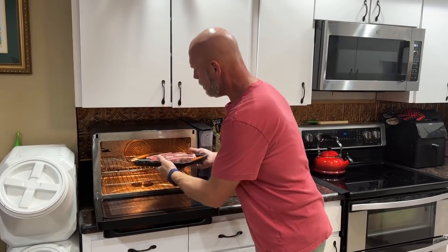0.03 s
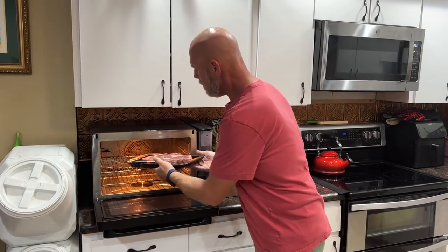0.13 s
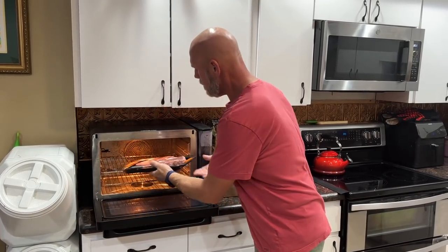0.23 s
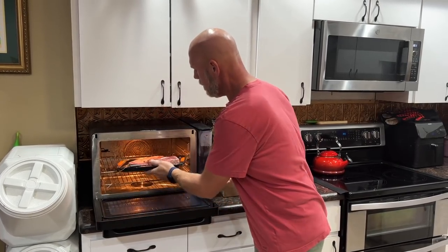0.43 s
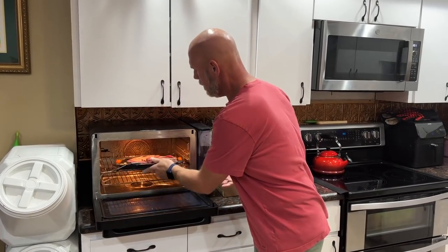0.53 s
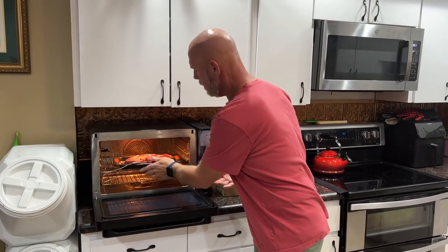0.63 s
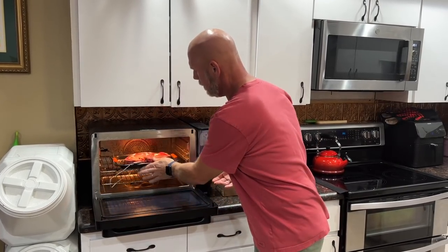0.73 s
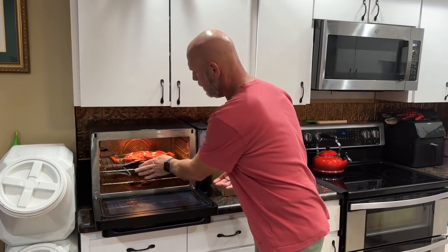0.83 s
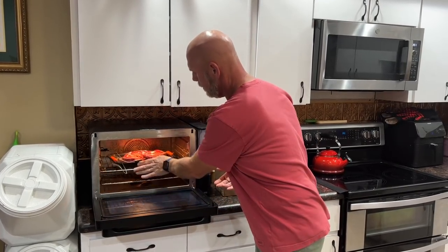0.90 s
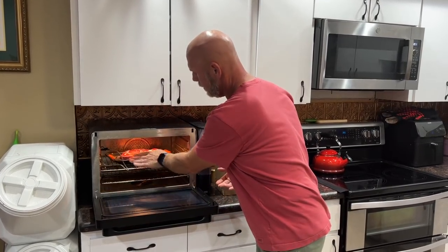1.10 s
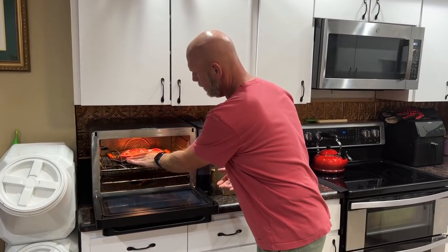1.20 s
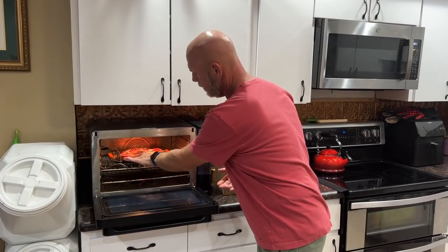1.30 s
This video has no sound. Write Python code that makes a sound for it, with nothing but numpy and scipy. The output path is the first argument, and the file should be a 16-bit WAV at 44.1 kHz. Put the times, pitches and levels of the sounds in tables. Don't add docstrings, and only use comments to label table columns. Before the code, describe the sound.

Close up in a small reverberant kitchen, a tray is pushed onto an oven rack: sharp metallic clang and scrape, a brief lull, a second clatter, then light taps and low rumbles over steady fan hum.

```python
import sys
import numpy as np
from scipy import signal
from scipy.fft import rfft, irfft
from scipy.io import wavfile
from scipy.ndimage import uniform_filter1d

SR = 44100
rng = np.random.default_rng(int(sys.argv[2]) if len(sys.argv) > 2 else 0)


def file_out(sig):
    cols = np.atleast_2d(sig).T
    lim = np.clip(cols, -1, 1)
    pcm = np.round(lim * 32767).astype(np.int16)
    wavfile.write(sys.argv[1], SR, pcm)


def makeup_ratio(level_db):
    decades = np.asarray(level_db, float) / 20
    return 10 ** decades


N = 59535


def evened(x):
    return x / np.sqrt(np.mean(x ** 2) + 1e-20)


def read(points, hz):
    f, value = np.transpose(points)
    return np.interp(np.log(hz + 1), np.log(f + 1), value)


def resonate(x, hz, width):
    r = np.exp(-np.pi * width / SR)
    return 2 * signal.lfilter([1 - r], [1, -r * np.exp(2j * np.pi * hz / SR)], x).real


# (frequency [Hz], density [dB per Hz])
AIR_COLOUR = [(30, -48), (50, -14), (122, -8), (176, -38.5), (230, -9), (330, -24.5), (800, -25.5),
              (9000, -61.5), (16500, -85)]
# (frequency [Hz], correlation [0-1])
AIR_LIKENESS = [(60, 1), (240, 0.84), (950, 0.43), (3770, 0.41), (15000, 0.18)]
# (frequency [Hz], width [Hz], level [dB])
FAN_TONES = [(51.4, 14.7, -55.5), (114, 12.4, -52), (234.9, 6.6, -56), (475.6, 27, -53.5),
             (1300, 15, -70.5)]
# (time [s], level [dB])
FAN_SWELL = [
    (0, -8),
    (.5, 0),
    (.8, 5),
    (1.35, 1.5),
]


def fan():
    frames, hz = N // 512 + 5, np.fft.rfftfreq(2048, 1 / SR)
    a, b, c, d = rng.standard_normal((frames, 1025, 4)).T
    same = np.clip(read(AIR_LIKENESS, hz), -1, 1)[:, None]
    left = a + 1j * b
    right = same * left + np.sqrt(1 - same ** 2) * (c + 1j * d)
    bands = np.array([left, right]) * makeup_ratio(read(AIR_COLOUR, hz))[:, None]
    air = signal.istft(bands, nperseg=2048, noverlap=1536)[1][:, 2048:N + 2048]
    air = makeup_ratio(-43) * evened(air)

    noise = rng.standard_normal(N + SR)
    swell = makeup_ratio(np.interp(np.arange(N) / SR, *np.transpose(FAN_SWELL)))
    tones = np.zeros(N)
    for hz, width, db in FAN_TONES:
        tone = resonate(resonate(noise, hz, width), hz, width)[SR:]
        tones += makeup_ratio(db) * swell ** np.sqrt(hz / 238) * evened(tone)
    return np.pad(air, ((0, 0), (0, N - air.shape[1]))) + tones


def decaying(colour, t60s, size):
    hz, t, z = signal.stft(rng.standard_normal((2, size)), SR, nperseg=256)
    fade = makeup_ratio(-60 * t / read(t60s, hz)[:, None])
    tail = signal.istft(z * fade, SR, nperseg=256)[1][:, :size]

    f = np.fft.rfftfreq(8192, 1 / SR)
    log_gain = np.log(makeup_ratio(np.maximum(read(colour, f), -100)))
    mirrored = np.r_[log_gain, log_gain[-2:0:-1]]
    blow = np.fft.ifft(np.exp(signal.hilbert(mirrored).conj())).real[:4096]

    evenness = 0.7
    modes = rfft(tail, 2 * size)
    power = abs(modes) ** 2 + 1e-20
    near = uniform_filter1d(power, size=9, axis=1)
    wide = uniform_filter1d(power, size=151, axis=1)
    tail = irfft(modes * (wide / near) ** (evenness / 2), 2 * size)[:, :size]

    tail = signal.fftconvolve(tail, blow[None], axes=1)[:, :size]
    return tail / np.linalg.norm(tail, axis=1, keepdims=True), blow / np.linalg.norm(blow)


# (frequency [Hz], t60 [s])
KITCHEN_DECAY = [(150, 0.49), (1000, 0.82), (4000, 0.7), (14000, 0.28)]


def kitchen(x):
    tail = decaying([(60, -11), (16000, 1)], KITCHEN_DECAY, SR)[0]
    tail = np.pad(tail, ((0, 0), (400, 0)))
    return makeup_ratio(-8) * signal.fftconvolve(x, tail, axes=1)[:, :N]


def swelling_modes(events):
    out = np.zeros(N)
    rise_turns = 2.03
    for s, hz, db, t60 in events:
        age = np.maximum(np.arange(N) / SR - s, 0)
        rise = np.sin(np.pi / 2 * np.minimum(age * np.sqrt(hz * 150) / rise_turns, 1)) ** 2
        wave = np.sin(2 * np.pi * hz * age + rng.uniform(0, 2 * np.pi))
        out += makeup_ratio(db + 5 - 60 * age / t60) * rise * wave
    return out


# (time [s], pitch [Hz], level [dB], t60 [s])
SHUDDERS = [(.01, 53.4, -40, .4), (0.069, 54, -40, 0.42), (.14, 50.1, -36.5, 0.32), (.39, 52.6, -39.5, .4),
            (.52, 52, -41, .6), (.73, 55, -33, .35), (.8, 50, -36, 0.34), (.85, 62, -37.5, .3),
            (.955, 50, -33, .35), (1.019, 53, -36.5, .3), (1.105, 54.2, -33, 0.4), (1.19, 55.8, -37, .3),
            (1.299, 50.3, -35, .4)]


def shudders():
    return swelling_modes(SHUDDERS)


# (time [s],
# pitch [Hz], level [dB], t60 [s])
NOTES = [(.24, 282, -30.5, 0.28), (.252, 107.4, -20.5, 0.12), (.285, 256, -30, 0.18),
         (0.31, 108, -31, 0.35), (.32, 183, -33, 0.27), (.43, 294, -35, 0.89), (.503, 168, -22, 0.22),
         (.52, 300, -34, 0.41), (.525, 648, -31, 0.21), (0.564, 180, -26.5, 0.34), (0.59, 225.2, -25, 0.27),
         (0.61, 340, -24, 0.12), (0.6, 180, -31, 0.28), (0.64, 350, -29.5, 0.14), (0.71, 210, -35, 0.16),
         (0.66, 70, -44, 0.51), (0.8, 390, -31.5, 0.089), (0.795, 111.6, -32.5, 0.23),
         (.572, 1530, -22, 0.21), (.31, 2190, -33, 0.16), (.24, 3160, -24.5, 0.098),
         (.492, 3200, -26, 0.063), (.7, 1322, -53.5, 2.4), (1.0845, 2260, -37, .045),
         (1.0855, 2750, -39, .045), (1.153, 2960, -48, .04), (1.06, 2520, -52, .07), (1.01, 2750, -52, .07),
         (1.111, 1480, -39, .06), (1.1, 770, -43.5, 0.21), (0.51, 2600, -39, 0.04),
         (.226, 1900, -34, 0.075), (.295, 680, -32, .15), (.393, 492, -37, .12), (.24, 1075, -31.5, 0.23),
         (.275, 1405, -32, 0.19), (.575, 1075, -32, .3), (.7, 240, -35, 0.17), (.755, 162, -39, 0.29),
         (.74, 481, -48, 2.0), (.76, 466, -47, .8), (.505, 1040, -32.5, 0.23), (1.335, 4680, -58, .08),
         (.74, 355, -48.5, 1.2), (1.2, 234, -43, 0.59), (1, 102, -41, 0.33), (1.2, 100, -42, 0.35)]


def notes():
    return swelling_modes(NOTES)


# (time [s], fizz level [dB], clang level [dB], boom level [dB], chatter length [s])
CONTACTS = [(0.2242, -27.5, -42.5, -61, 0.022), (0.235, -28, -24, -31.5, 0.015),
            (0.267, -36, -28, -35, .012), (0.252, -36, -25.5, -28, 0.028), (0.284, -30, -24, -27, 0.052),
            (0.314, -38, -28, -34, 0.023), (0.348, -47, -30, -34.5, 0.049), (0.39, -52, -38.5, -35, 0.026),
            (0.452, -71, -44.5, -55, 0.011), (0.487, -22.5, -36.5, -37, 0.022),
            (0.507, -33.5, -31, -30.5, 0.02), (0.531, -35, -29, -34, 0.0094), (0.558, -25, -41, -48, 0.015),
            (0.568, -23.5, -24.5, -27, 0.019), (.587, -39, -23, -26, 0.0095), (0.613, -33, -26, -27, 0.017),
            (.625, -38.5, -30, -33.5, .012), (0.662, -43, -28.5, -36, 0.024), (0.713, -54, -47, -35, 0.012),
            (0.742, -48.5, -37, -35, 0.044),
            (0.794, -61, -63, -40.5, 0.071), (0.218, -53.5, -49, -63, .012),
           (0.909, -60.5, -54.5, -46.5, 0.067), (0.995, -55, -60, -48, 0.023),
           (1.083, -48.5, -38.5, -42, 0.0086), (1.097, -52, -44.5, -45, 0.01),
           (1.107, -54.5, -39.5, -41.5, 0.011), (1.126, -58.5, -43, -40.5, .01),
           (1.138, -75, -66, -47, 0.03), (1.21, -73, -53.5, -46, 0.09), (1.268, -63, -54, -64, 0.098),
           (1.329, -61, -49.5, -55, 0.035)]


def slips():
    slips_per_s, spread_db, rise_share = 9000, 2.5, 0.22
    t = np.arange(N) / SR
    strength = makeup_ratio(spread_db * np.minimum(rng.exponential(1, N), 4))
    train = strength * (rng.random(N) < slips_per_s / SR)
    train = evened(train * rng.choice([-1., 1.], N))
    power = np.zeros((3, N))
    for s, fizz_db, clang_db, boom_db, length in CONTACTS:
        age = np.maximum(t - s, 0)
        shape = np.minimum(age / (rise_share * length), 1) * np.exp(-(age / length) ** 2)
        power += (makeup_ratio([[fizz_db], [clang_db], [boom_db]]) * shape) ** 2 * 0.043 / length
    return np.sqrt(power) * train


# (frequency [Hz], t60 [s])
DENSE_DECAY = [(100, 0.067), (400, 0.49), (1500, 0.25), (5000, 0.28), (15000, 0.18)]


def body(colour, modes, modes_db):
    size = SR // 2
    t = np.arange(size) / SR
    wash, blow = decaying(colour, DENSE_DECAY, size)
    rings = np.zeros((2, size))
    for hz, db, t60 in modes:
        phase = rng.uniform(0, 2 * np.pi, (2, 1))
        rings += makeup_ratio(db - 60 * t / t60) * np.sin(2 * np.pi * hz * t + phase)
    rings *= np.minimum(t / 0.001, 1)
    out = wash + makeup_ratio(modes_db) * rings / np.linalg.norm(rings[0])
    return out + makeup_ratio(-4) * np.pad(blow, (0, size - len(blow)))


# (frequency [Hz], density [dB per Hz])
FIZZ = [(900, -44), (1900, -8.5), (3200, -1.5), (4350, -14.5), (5500, -4.5), (7000, -5.5), (9500, -9),
        (15600, -13)]
CLANG = [(210, -21), (350, -5), (520, -8.5), (720, -0.5), (815, -8.5), (960, -1.5), (1400, -2.5),
         (1960, -5.5), (6000, -18.5), (7800, -63), (13200, -120)]
BOOM = [(41, -52), (70, -14.5), (174, 0), (231, -5), (265, -3.5), (303, -3), (600, -15.5), (780, -35.5),
        (1320, -120)]
# (frequency [Hz], level [dB], t60 [s])
WIRE_MODES = [(3260, -1, 0.045), (5405, 3, 0.1), (6420, 1, 0.066), (7050, -1.5, 0.16)]
TRAY_MODES = [(655, -7, .25), (754, -9, .25), (880, -12, .2), (1080, -5, .3), (1266, -6, .25),
              (1404, -7, .2), (1535, -9, .15), (1748, -8, .2), (2200, -9, .2), (3080, -12, .15)]
BOX_MODES = [(110.8, 3.5, 0.29), (179, -4, 0.3), (270.2, 0, 0.53), (299.6, -2.5, 0.23), (351.2, 0, 0.27),
             (485, -4.5, 0.4)]


def tray():
    drives, spots = slips(), 3
    out = (notes() + shudders()) * np.ones((2, 1))
    turn = np.arange(N) / SR * 14.0
    for spot in range(spots):
        share = np.sqrt(2 / spots) * np.cos(np.pi * (turn - spot) / spots) ** 2 * np.sqrt(4 / 3)
        wires = body(FIZZ, WIRE_MODES, -10)
        sheet = body(CLANG, TRAY_MODES, -4.5)
        box = body(BOOM, BOX_MODES, -6.5)
        for drive, part in zip(drives, (wires, sheet, box)):
            out = out + signal.fftconvolve(share * drive[None], part, axes=1)[:, :N]

    a, b = rfft(out)
    hz = np.fft.rfftfreq(N, 1 / SR)
    same = np.interp(hz, [250, 900, 3000, 6000], [.85, .28, .35, .45])
    other = np.sqrt(1 - same ** 2)
    right = (same * a + other * b) / np.sqrt(np.where(hz < 400, same + other, 1))
    lead_s = 2.77 / SR
    left = a * np.exp(2j * np.pi * np.minimum(hz, 3300) * lead_s)
    return irfft(np.array([left, right]), N)


def scene():
    metal = tray()
    return metal + kitchen(metal) + fan()


def low_pass(x):
    return signal.sosfilt(signal.butter(12, 16960, fs=SR, output="sos"), x)


# (frequency [Hz], phase [half turns])
TREBLE_TURNS = [(8700, 0), (9850, .95), (10500, 1.05), (11700, 1.95), (12300, 2.05), (13500, 2.95),
                (14200, 3.05), (15400, 4)]


def record(dry):
    hz = np.fft.rfftfreq(N, 1 / SR)
    left, right = rfft(dry)
    tied = np.clip((hz - 7200) / 1400, 0, .99)
    turned = left * np.exp(1j * np.pi * np.interp(hz, *np.transpose(TREBLE_TURNS)))
    right = np.sqrt(1 - tied ** 2) * right + tied * turned
    left_db = 4.2
    lean = makeup_ratio(left_db / 2 * np.clip(hz / 1100, .35, 1) * (1 - tied))
    edge_db = -70 * np.clip((hz - 15680) / 300, 0, 1)
    mix = irfft(np.array([left * lean, right / lean]) * makeup_ratio(edge_db), N)
    return low_pass(mix)


dry = scene()
out = record(dry)
file_out(out)
```